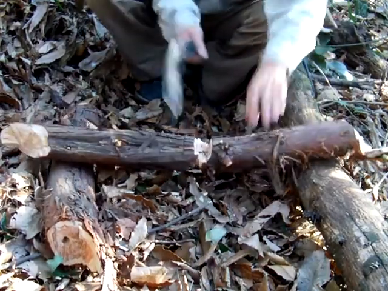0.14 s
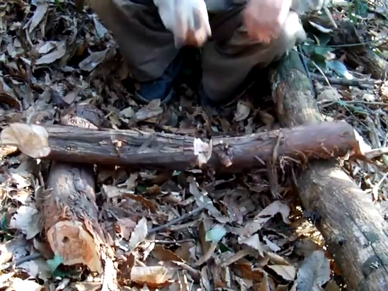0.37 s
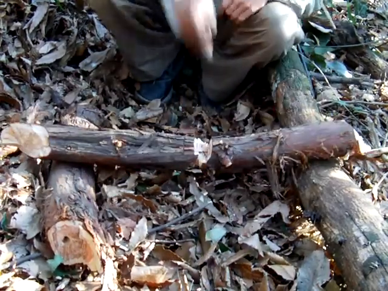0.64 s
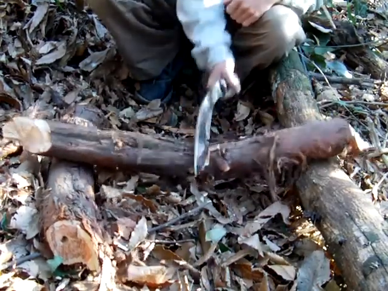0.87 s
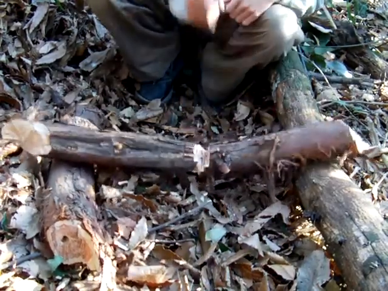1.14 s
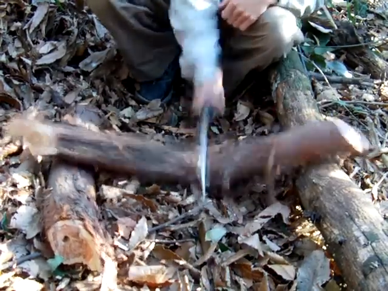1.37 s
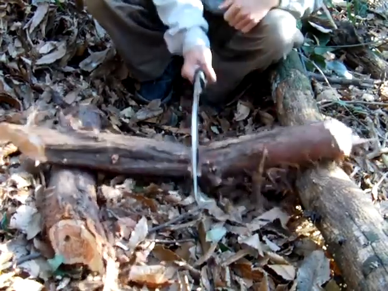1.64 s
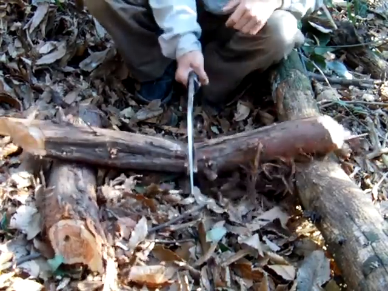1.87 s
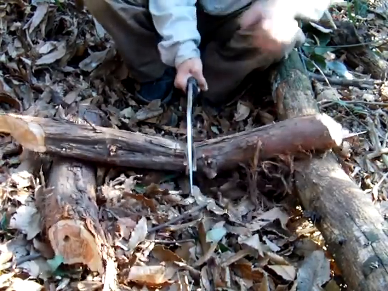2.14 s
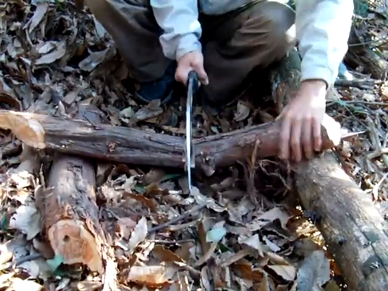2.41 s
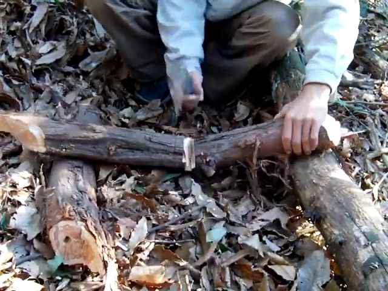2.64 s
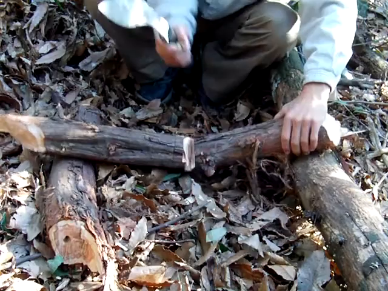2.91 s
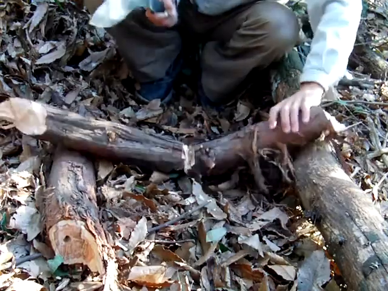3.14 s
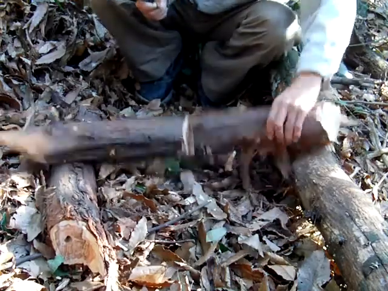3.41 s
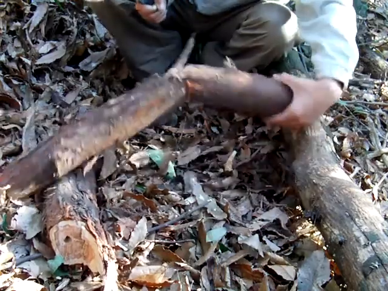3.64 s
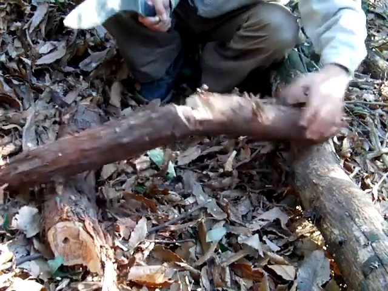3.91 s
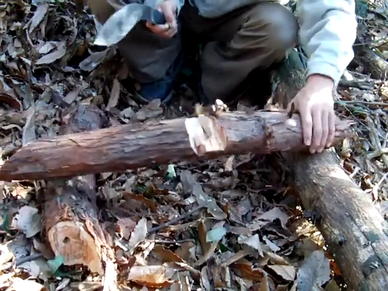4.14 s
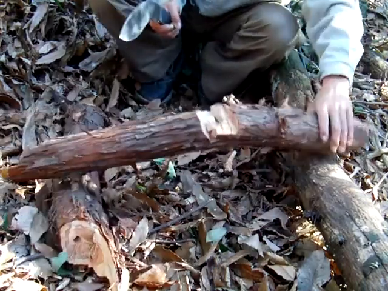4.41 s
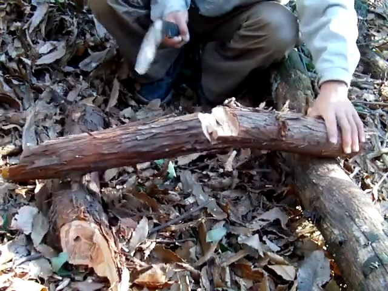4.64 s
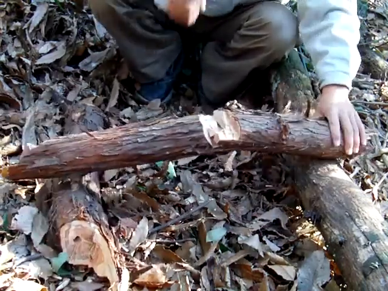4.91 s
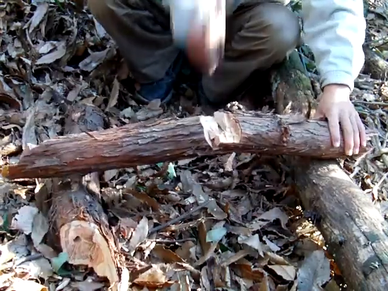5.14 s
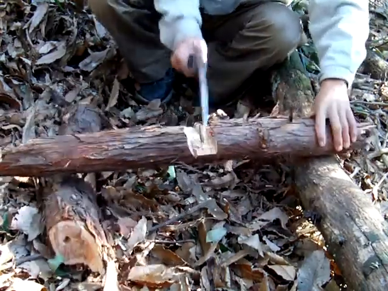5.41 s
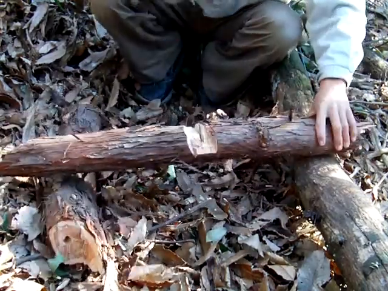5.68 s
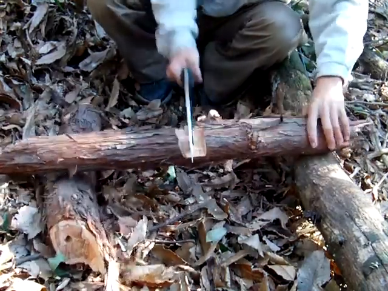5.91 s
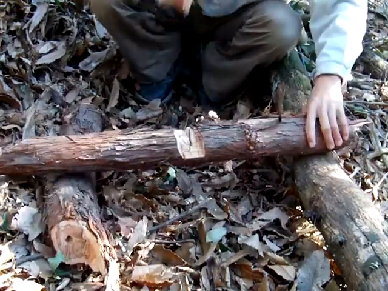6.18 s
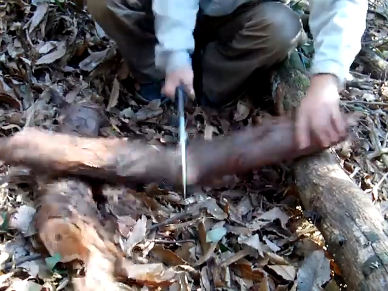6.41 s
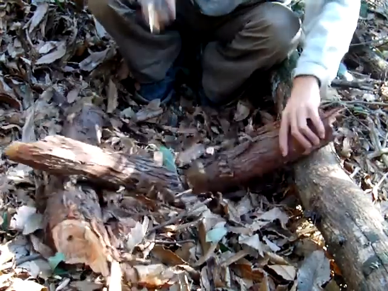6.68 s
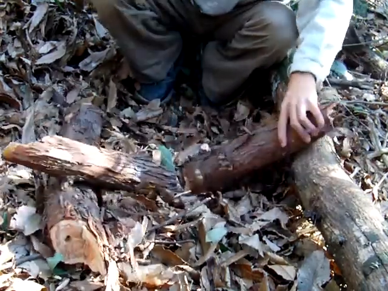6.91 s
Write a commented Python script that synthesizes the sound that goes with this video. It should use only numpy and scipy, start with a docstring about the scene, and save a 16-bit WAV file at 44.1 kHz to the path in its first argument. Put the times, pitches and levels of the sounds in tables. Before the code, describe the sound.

Hard, dry blade blows bite into wood outdoors, with faint log knocks, twig snaps and leaf rustle between, ending in a crunchy break.

```python
"""A heavy blade chops a small log that bridges two others on a forest floor, until it snaps.
Each blow is a few quick contacts: crushing fibres drive damped modes of the wood, and tearing adds a crack.
Noise tails stand for the sound scattered back by trunks and ground; the log also knocks, ticks and splinters.
Leaves and bark rustle as dense clumps of tiny cracks, and single twigs or leaves snap as short rings.
Filtered noise gives the air and a far rumble; a small recorder adds hiss and two thin sine whines."""
import sys
import numpy as np
from scipy import signal
from scipy.io import wavfile

SR = 44100
rng = np.random.default_rng(int(sys.argv[2]) if len(sys.argv) > 2 else 0)


def store_pcm(level_fs):
    """Save levels as 16-bit WAV."""
    pcm = np.round(np.clip(level_fs, -1, 1) * 32767).astype(np.int16)
    wavfile.write(sys.argv[1], SR, np.atleast_2d(pcm).T)


def invert_db(level):
    """Linear amplitude ratio for a level in decibels (20 dB per decade), elementwise."""
    return 10 ** (np.asarray(level, dtype=float) / 20)


N = 310735   # length in samples
EDGES_HZ = 32 * 2 ** (np.arange(19) / 2)   # half-octave band edges
CRUSH_CYCLES = 5.66   # fibres crush for a few cycles of the favoured pitch


def rms_one(x):
    """Normalisation: scale to unit rms."""
    return x / np.sqrt(np.mean(x ** 2) + 1e-20)


def at_hz(points, hz):
    """Spectral interpolation: read a table on a log-frequency axis."""
    table_hz, value = np.transpose(points)
    return np.interp(np.log(hz), np.log(table_hz), value)


def drift(rate_hz):
    """Low-pass noise: a slow random modulation of unit rms, smoothed by two equal poles at rate_hz."""
    step = 40   # samples between drawn points
    r = np.exp(-2 * np.pi * rate_hz * step / SR)
    white = rng.standard_normal(N // step + 2002)
    slow = signal.lfilter([1], [1, -2 * r, r * r], white)[2000:]   # skip the filter's start
    return np.interp(np.arange(N) / step, np.arange(len(slow)), rms_one(slow))


def band(x, low_hz, high_hz):
    """Band-pass filtering: keep the spectrum between two corner frequencies."""
    return signal.sosfilt(signal.butter(2, [low_hz, high_hz], "band", fs=SR, output="sos"), x)


def high_pass(x, order, hz):
    """High-pass filtering: attenuate the spectrum below a corner frequency."""
    return signal.sosfilt(signal.butter(order, hz, "high", fs=SR, output="sos"), x)


def ring(x, hz, t60):
    """Damped resonance: a unit click starts a decaying sine of initial height 1."""
    r, w = invert_db(-60 / (t60 * SR)), 2 * np.pi * hz / SR
    return signal.lfilter([0, np.sin(w)], [1, -2 * r * np.cos(w), r * r], x + 1e-18)


def bands():
    """Constant-percentage bandwidth: half-octave (low, centre, high) frequencies."""
    return zip(EDGES_HZ, np.sqrt(EDGES_HZ[:-1] * EDGES_HZ[1:]), EDGES_HZ[1:])


def swell(s, db, rise_s, hold_s, fall_s):
    """Exponential envelope: power of a motion that rises and falls by 20 dB in the given times."""
    t = np.arange(N) / SR - s
    rising = t / max(rise_s, 1e-3)   # times below 1 ms, even negative ones, act as 1 ms
    falling = (max(hold_s, 0) - t) / max(fall_s, 1e-3)
    slope = np.minimum(0, np.minimum(rising, falling))
    return invert_db(2 * (db + 20 * slope))


def dull_and_bright(power, treble_db):
    """Two-band energy split: power of the dull part, and of a bright part treble_db above it."""
    return np.array([power, power * invert_db(2 * treble_db)])


# Steady tones of the recorder's electronics: f/Hz, rms level/dB
WHINES = [(3933.6, -79), (11800.7, -79)]


def whines():
    """Pure tones: sines of constant amplitude, sqrt(2) times their rms."""
    t = np.arange(N) / SR
    return sum(invert_db(db) * np.sqrt(2) * np.sin(2 * np.pi * hz * t) for hz, db in WHINES)


# Level of a far low rumble ahead of the recorder: t/s, rms level/dB
RUMBLE = [(0.0, -69), (0.21, -64), (0.45, -75), (1.3, -78.5), (1.59, -66.5), (2.1, -74.5), (3.0, -74.5),
          (3.49, -57), (3.92, -73.5), (5.7, -78), (6.4, -71), (6.8, -82), (7.04, -89)]


def rumble():
    """Amplitude-modulated band noise: a low noise that swells now and then."""
    noise = rng.standard_normal(N)
    low = rms_one(band(band(noise, 130, 280), 130, 280))
    s, level_db = np.transpose(RUMBLE)
    return invert_db(np.interp(np.arange(N) / SR, s, level_db)) * low


# Relative spectrum of the hiss of woods and microphone: f/Hz, density level/dB per Hz
AIR = [(18, -51), (30, -18), (129, -19.5), (241, -1.5), (417, -2.5), (541, 0.5), (1180, -3.5),
       (3530, -12.5), (3820, -7), (4130, -12), (6430, -15), (7720, -13), (11400, -17), (15200, -27)]


def air():
    """Shaped broadband noise: hiss of the woods and the microphone, its bands wavering slightly."""
    level_db, patchy_db = -62, 0.5   # rms ahead of the recorder; spread of each band's level
    white = rng.standard_normal((2, N))   # neighbouring bands use different noise
    hiss = 0
    for k, (low, hz, high) in enumerate(bands()):
        gain_db = at_hz(AIR, hz) + patchy_db * drift(1.3)
        hiss = hiss + invert_db(gain_db) * band(white[k % 2], low, high)
    return invert_db(level_db) * rms_one(hiss)


# Hand, log and feet stir leaves and bark:
# t/s, dull-part level/dB, 20 dB rise time/s, hold/s, 20 dB fall time/s
STIRS = [(1.854, -51.5, 0.17, 0.0093, 0.05), (2.053, -62.5, 0.1, 0.009, 0.3), (2.17, -60, 0.1, .01, 0.5),
         (2.3, -59.5, -0.1, 0.035, 0.23), (2.34, -54.5, -0.07, 0.0033, 0.13),
         (2.416, -54, .06, 0.015, -0.07), (2.525, -55, 0.02, 0.016, 0.12),
         (2.683, -53.5, 0.06, 0.0071, 0.12), (3.0, -58.5, 0.18, 0.044, 0.1),
         (3.069, -55, 0.03, 0.047, 0.18), (3.237, -57.5, -0.1, 0.036, 0.3), (3.296, -56, 0.08, 0.02, 0.36),
         (3.387, -55, 0, 0.014, -0.16), (3.417, -51, .06, 0.035, 0.15), (3.601, -53, -0.1, 0.064, .3),
         (3.74, -55, 0.1, 0.24, 0.1), (3.939, -48, -0.2, 0.005, 0.03), (4.04, -63, 0.3, 0.023, .5),
         (4.33, -60.5, -0.4, 0.055, 0.1), (4.406, -56.5, 0.12, 0.061, 0), (4.505, -57, 0.08, .015, 0.02),
         (5.118, -61, -0.5, 0.0082, 0.05), (6.5, -37.5, 0.03, 0.039, 0.07), (6.584, -43, 0.03, 0.077, 0.03),
         (6.674, -52, -0.13, 0.026, 0.4), (6.94, -55.5, .3, 0.036, 2.5), (7.04, -49, -0.03, 0.043, .1)]


def stirs():
    """Energy summation: powers of the separate stirring motions add."""
    return sum(dull_and_bright(swell(*row), -3) for row in STIRS)


# Single leaves flick: t/s, dull-part level/dB, relative treble level/dB
FLICKS = [(.03, -58, -5), (.644, -67, -15), (1.096, -55, -3), (1.228, -60, -4), (1.955, -58, 3),
          (2.385, -52.5, 0), (2.431, -49, -1.5), (2.48, -65, -11), (4.01, -48, -5), (4.64, -61.5, -5),
          (4.696, -61, -2), (4.73, -58.5, 1), (5.46, -55, -6), (5.542, -63, -9), (5.61, -70, 11),
          (5.672, -63.5, 9), (6.154, -62, -3.5), (6.66, -42, -6)]


def flicks():
    """Transient envelopes: each flick rises and falls at once, and the powers add."""
    rise_s, fall_s = 0.0071, 0.026   # per 20 dB
    return sum(dull_and_bright(swell(s, db, rise_s, 0, fall_s), treble_db) for s, db, treble_db in FLICKS)


# Chips fly from each chop and settle in the leaves:
# t/s, dull-part level/dB, relative treble level/dB, hold/s, 20 dB fall time/s
CHIPS = [(0.796, -52.5, -5, 0.05, 0.35), (1.455, -49.5, -3.5, 0.064, 0.36), (5.276, -52, -0.5, 0.064, 0.16),
         (5.895, -52.5, -4.5, 0.084, 0.18), (6.444, -44, -0.5, 0.041, .1)]


def chips():
    """Two-stage decay: a brief bright first spray over a slower settling."""
    glare_db, glare_fall_s = 8.5, 0.025   # above the dull part; per 20 dB
    power = 0
    for s, db, treble_db, hold_s, fall_s in CHIPS:
        power = power + dull_and_bright(swell(s, db, .01, hold_s, fall_s), treble_db)
        power[1] += swell(s, db + glare_db, .01, 0, glare_fall_s)
    return power


# Relative spectrum of the leaf cracks: f/Hz, density level/dB per Hz
LEAVES = [(180, -36), (300, -9.5), (445, -24), (516, -7.5), (628, -8), (804, -13), (1360, -1.5),
          (2340, -3.5), (3040, 0), (3760, -12.5), (4510, -4), (7750, -11.5), (10200, -12), (15200, -26)]
# Pitches the microphone probably favours in the rustle: f/Hz, width/Hz, level over the dull part/dB
MIC_PEAKS = [(1467, 540, -8.5), (3000, 600, -6.5)]


def rustle():
    """Random impulse process: dense tiny cracks in clumps, partly common to all bands, shaped by motion."""
    cracks_per_s, clump_db = 2500.0, 2.0   # middle rate and its spread
    size_db, patchy_db, shared = 2.0, 1.0, 0.1   # spread of crack size and of band level; common share
    at_rest = dull_and_bright(np.full(N, invert_db(2 * -70)), -6)
    dull_gain, bright_gain = np.sqrt(stirs() + flicks() + chips() + at_rest)

    born = rng.random((3, N)) < cracks_per_s * invert_db(clump_db * drift(60.0)) / SR
    size = invert_db(size_db * np.minimum(rng.exponential(1, (3, N)), 5))
    cracks = born * size * rng.choice([-1, 1], (3, N))
    cracks = cracks[:2] + shared * cracks[2]

    clumps_db, dull, bright = patchy_db * drift(80.0), 0, 0
    for k, (low, hz, high) in enumerate(bands()):
        if hz <= 300:
            continue
        gain_db = at_hz(LEAVES, hz) + clumps_db + patchy_db * drift(12.0)
        part = invert_db(gain_db) * band(cracks[k % 2], low, high)
        if hz < 4500:
            dull = dull + part
        else:
            bright = bright + part
    dull = rms_one(dull)
    for hz, width, db in MIC_PEAKS:
        peak = rms_one(band(cracks[0], hz - width / 2, hz + width / 2))
        dull = dull + invert_db(db + clumps_db) * peak
    return dull_gain * rms_one(dull) + bright_gain * rms_one(bright)


# Twig and leaf snaps: t/s, nominal peak level/dB, f/Hz, relative treble level/dB
SNAPS = [(0.641, -46, 1170, -17), (1.042, -38, 2950, -21.5), (1.09, -34.5, 1430, -27),
         (1.226, -41, 1390, -19.5), (1.814, -39, 2900, -17), (1.833, -38, 1000, -20),
         (1.849, -32, 1450, -21), (1.954, -43, 5550, -10), (2.344, -38.5, 4170, -21),
         (2.381, -37.5, 2540, -14), (2.422, -43, 1600, -14), (2.48, -41, 2000, -13),
         (3.152, -39, 2800, -16), (3.425, -31, 1360, -19), (3.6, -38, 3100, 3), (3.668, -34, 1380, -14),
         (3.826, -38, 1540, -3), (3.861, -39, 1290, 0), (3.903, -39, 1800, -7), (3.94, -35, 3090, 0),
         (4.406, -39, 3150, -13), (4.452, -38, 1930, -18), (4.469, -42, 3170, -29),
         (4.693, -42.5, 1510, -13), (4.726, -50.5, 1670, -8), (5.606, -47, 5740, -12.5),
         (5.671, -40.5, 6070, -6), (5.682, -56, 5500, -7.5), (6.504, -25, 2900, -18),
         (6.544, -26, 3000, -14.5), (6.584, -32, 3200, -16), (6.935, -47, 1740, -10),
         (6.969, -47.5, 1450, -21), (7.029, -39, 1640, -19)]


def snaps():
    """Brittle fracture: a first break and a burst of smaller cracks excite a short ring and wide bands."""
    ring_cycles, burst_ms = 9.8, 5.0   # t60 of the ring in cycles; burst decay constant
    first, click_share = 3.1, 0.94   # strength of the first break; click relative to ring
    t = np.arange(2048) / SR
    cracks = rng.standard_normal((len(SNAPS), len(t))) ** 3 / 4   # cubing favours a few large cracks
    out = np.zeros(N + len(t))
    for (s, peak_db, hz, treble_db), crack in zip(SNAPS, cracks):
        burst = crack * np.exp(-t * 1000 / burst_ms)
        burst[0] += first
        parts = ring(burst, hz, ring_cycles / hz), band(burst, 1100, 4100), band(burst, 4500, 15000)
        body, click, bright = (part / np.abs(part).max() for part in parts)
        sound = (body + click_share * click) / (1 + click_share) + invert_db(treble_db) * bright
        start = round(s * SR)
        out[start:start + len(t)] += invert_db(peak_db) * sound
    return out[:N]


# Decay time of the sound from ground and trunks: f/Hz, t60/s
SCATTER_T60 = [(300, 0.12), (1000, 0.27), (3000, 0.26), (8000, 0.16), (15000, 0.22)]
# Relative strength of that sound: f/Hz, level/dB
SCATTER = [(300, -23.5), (1000, -13.5), (1600, -22), (3100, -14), (5000, -5), (9000, -0.5), (15000, -15.5)]


def scatter(x):
    """Diffuse scattering: ground and trunks return a noise tail that decays band by band."""
    onset_ms = 1.2
    t = np.arange(SR // 2) / SR
    onset = 1 - np.exp(-t * 1000 / onset_ms)
    white = rng.standard_normal((2, len(t)))
    tail = 0
    for k, (low, hz, high) in enumerate(bands()):
        dying = white[k % 2] * invert_db(-60 * t / at_hz(SCATTER_T60, hz)) * onset
        dying = dying / np.sqrt(np.sum(dying ** 2))   # unit energy
        tail = tail + invert_db(at_hz(SCATTER, hz)) * band(dying, low, high)
    return signal.fftconvolve(x, tail)[:N]


# The log knocks on its supports:
# t/s, drive level/dB, relative thud level/dB, favoured f/Hz, relative crack level/dB
KNOCKS = [(2.691, -25, -5.5, 900, -28), (3.7405, -35, -3, 1000, -13.5), (3.751, -42, 3.5, 800, -19),
          (4.488, -33.5, 3.5, 830, -20.5), (4.501, -35, 1.5, 800, -22), (5.36, -40, -2.5, 800, -13.5),
          (5.374, -43, -3, 800, -10)]


def knocks():
    """Soft impact: one contact time and bandwidth for all knocks, with the wood free to ring."""
    octaves, crush_ms = 0.44, 4.3
    return [(s, db, thud_db, hz, octaves, crack_db, crush_ms, False)
            for s, db, thud_db, hz, crack_db in KNOCKS]


# Bright ticks and splinters of the wood:
# t/s, drive level/dB, favoured f/Hz, relative crack level/dB
TICKS = [(1.4417, -14, 3900, 2.5), (1.454, -22, 2110, -2), (4.0042, -29.5, 3900, -3),
         (4.0118, -38.5, 3600, 4), (2.696, -38.5, 1900, -23), (4.4898, -31, 3070, -26),
         (6.6561, -26.5, 2300, -15)]


def ticks():
    """Light impact or fracture: little thud, and a contact time inverse to the favoured pitch."""
    thud_db, octaves = -29, .5
    return [(s, db, thud_db, hz, octaves, crack_db, CRUSH_CYCLES * 1000 / hz, False)
            for s, db, hz, crack_db in TICKS]


# The blade bites, twists and rebounds in the wood: t/s, drive level/dB, relative thud level/dB,
# favoured f/Hz, favoured width/octaves, relative crack level/dB
BITES = [(0.7463, 0.5, -33, 2820, 0.8, -11.5), (0.7474, -2, -45, 1640, 0.32, -14),
         (0.752, 2.5, -25.5, 1870, 0.8, -15), (0.766, -17, -6, 2700, 0.48, -7),
         (0.7744, -13.5, -32.5, 1440, 1.3, -12), (1.419, -4.5, -9.5, 3280, 0.81, -14),
         (1.4209, -3, -5, 1320, 1, -17), (5.2297, -0.5, -38, 2900, 0.71, -18),
         (5.232, -3, -28, 1470, 0.62, -16.5), (5.234, -1, -29.5, 2070, 0.29, -15),
         (5.8536, 3.5, -9.5, 1660, 1.06, -22.5), (5.864, -14, -27, 1450, 0.82, -10.5),
         (6.4134, -3, -3, 1040, 1.8, -15), (6.4248, 0, -29, 2910, 0.76, -6.5),
         (6.427, -4.5, -26, 1070, 0.21, -15)]


def bites():
    """Hard impact: contact time is inverse to the favoured pitch, and the seated blade damps the wood."""
    return [(*row, CRUSH_CYCLES * 1000 / row[3], True) for row in BITES]


# Modes of the log, ringing free of the blade: f/Hz, relative level/dB, t60/s
LOG = [(303, -11.5, .05), (430.3, -2, 0.051), (534, -7, 0.044), (630, -3, 0.02), (900, -7.5, 0.023),
       (1000, -9, .04), (1253, -8, .035), (1450, -8, 0.036), (1640, -7, 0.03), (1975, -9, 0.018),
       (2289, -6.5, 0.022), (2682, -6.5, 0.019), (2910, -6, 0.031), (3200, -5.5, 0.024), (3600, -4, 0.0094),
       (4014, -9.5, 0.021), (4530, -4, 0.011), (5850, -11, 0.014)]


def log_contacts():
    """Modal excitation: a click and crushing fibres drive the modes near a favoured pitch; noise adds a crack."""
    spread_db, click_share, rise_ms = 0.5, 0.94, .5   # chance in mode level; click height; force rise
    tear_factor, crack_db = 1.5, 2.5   # crack decay over crush time; added crack level
    thud_top_hz, blade_damping = 700, 0.48   # blade_damping: share of t60 left with the blade in the wood
    size = 2048   # samples of force per contact
    t_ms = np.arange(size) / SR * 1000
    rise = 1 - np.exp(-t_ms / rise_ms)
    hz, level_db, t60 = np.transpose(LOG)
    probes = np.exp(-2j * np.pi * np.outer(hz, np.arange(size) / SR))   # Fourier kernel at each mode
    force = np.zeros((2, len(LOG), N + size))   # free wood, wood held by the blade
    tearing = np.zeros(N + size)

    touches = bites() + knocks() + ticks()
    for s, peak_db, thud_db, focus_hz, octaves, tear_db, crush_ms, bitten in touches:
        fibres, torn = rng.standard_normal((2, size))
        at = slice(round(s * SR), round(s * SR) + size)
        crush = fibres * rise * np.exp(-(t_ms / crush_ms) ** 2)
        crush /= np.sqrt(np.sum(crush ** 2))
        crush[round(rise_ms * SR / 1000)] += click_share
        even = 1 / np.clip(np.abs(probes @ crush), .5, 2)   # evens out the force spectrum within 6 dB
        bell_db = -6 * (np.log2(hz / focus_hz) / octaves) ** 2
        colour_db = np.where(hz < thud_top_hz, thud_db, np.maximum(bell_db, -24))
        chance_db = spread_db * rng.standard_normal(len(LOG))
        drive = even * invert_db(peak_db + colour_db + level_db + chance_db)
        force[int(bitten), :, at] += drive[:, None] * crush
        decay = np.exp(-t_ms / (tear_factor * crush_ms))
        tearing[at] += invert_db(peak_db + tear_db + crack_db) * torn * rise * decay

    body = 0
    for part, share in zip(force, (1, blade_damping)):
        for k in range(len(LOG)):
            body = body + ring(part[k, :N], hz[k], share * t60[k]) * (-1) ** k   # alternate polarity
    body = high_pass(body, 2, 320)   # a thin log radiates little bass
    crack = high_pass(tearing[:N] + 1e-18, 2, 3900)
    return body + signal.lfilter(*signal.butter(2, 9800, fs=SR), crack)


def scene():
    """Superposition: wood and snaps with their scattered tails over leaves, air and rumble."""
    struck = log_contacts() + snaps()
    return (struck + scatter(struck) + rustle() + air() + rumble())[None]


def band_limit(x):
    """A steep low-pass at the top of the band."""
    return signal.sosfilt(signal.butter(12, 16530, fs=SR, output="sos"), x)


def record(dry):
    """Saturation and linear filtering: rounded peaks, bass cut, preamp rumble, notch, whines, band limit."""
    x = 1.306 * np.tanh(dry / 1.272)
    x = high_pass(x, 4, 230)
    x = x + invert_db(-91.5) * rms_one(band(rng.standard_normal(N), 46, 160))   # faint preamp rumble
    notch_hz, notch_width_hz = 7867, 260
    x = signal.lfilter(*signal.iirnotch(notch_hz, notch_hz / notch_width_hz, SR), x)
    x = x + whines()
    x = signal.sosfilt(signal.cheby2(16, 60, 16100, fs=SR, output="sos"), x)   # 60 dB down from 16.1 kHz
    return band_limit(x)


dry = scene()
out = record(dry)
store_pcm(out)
```